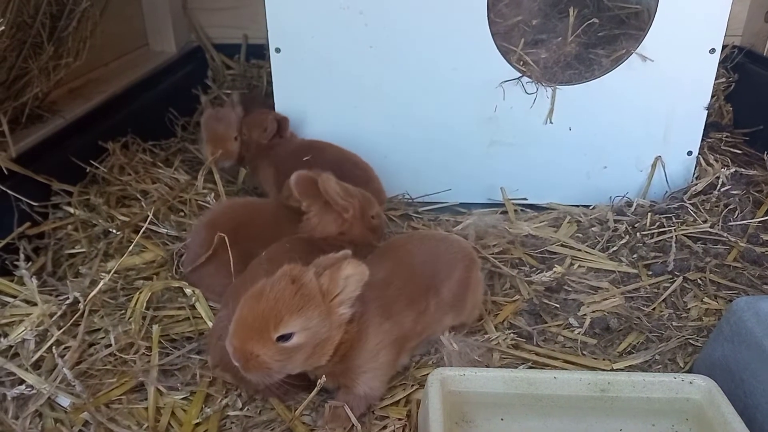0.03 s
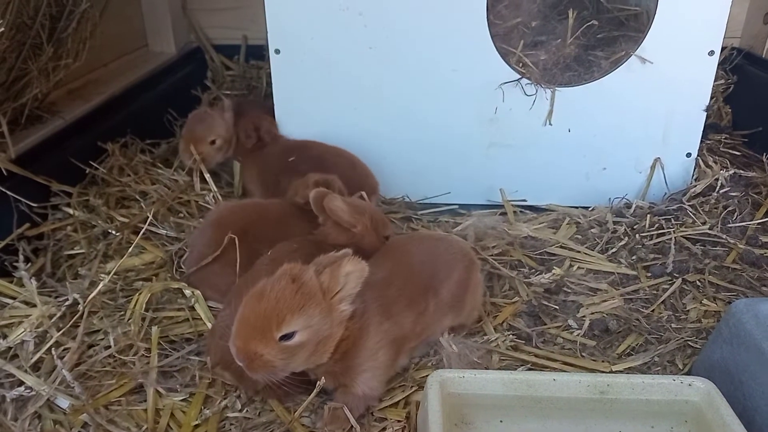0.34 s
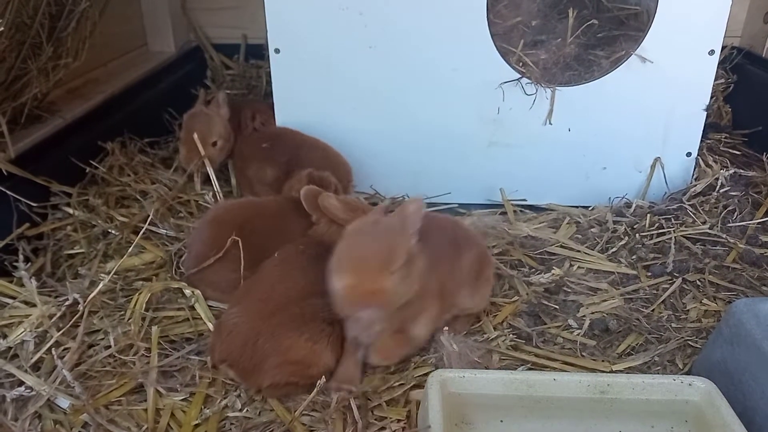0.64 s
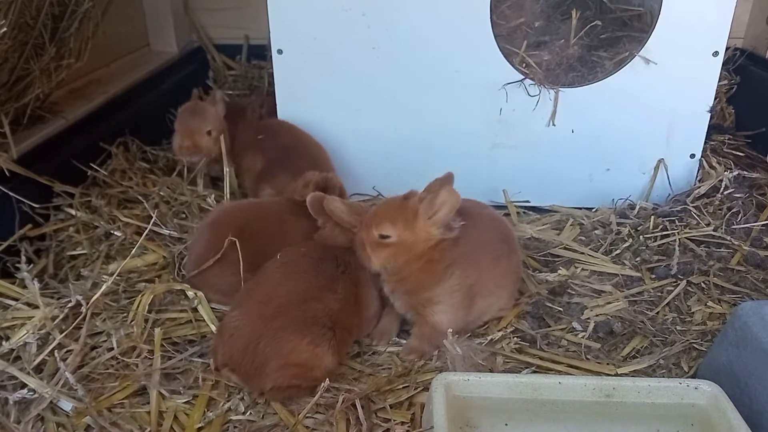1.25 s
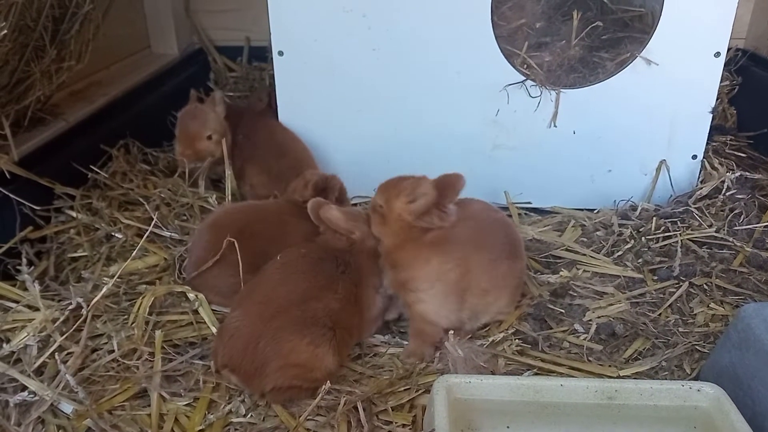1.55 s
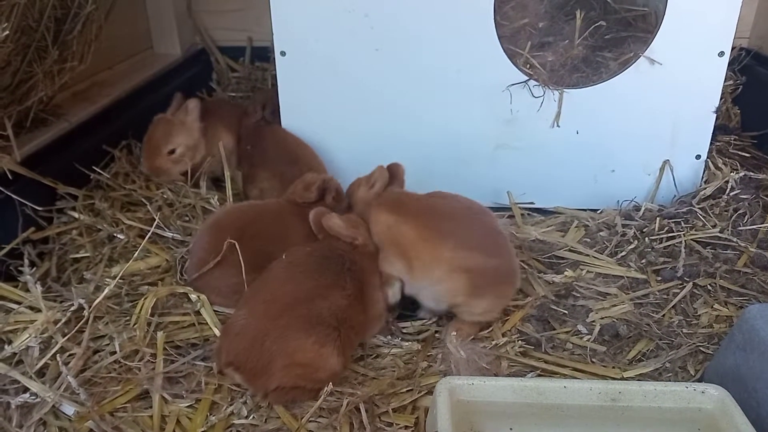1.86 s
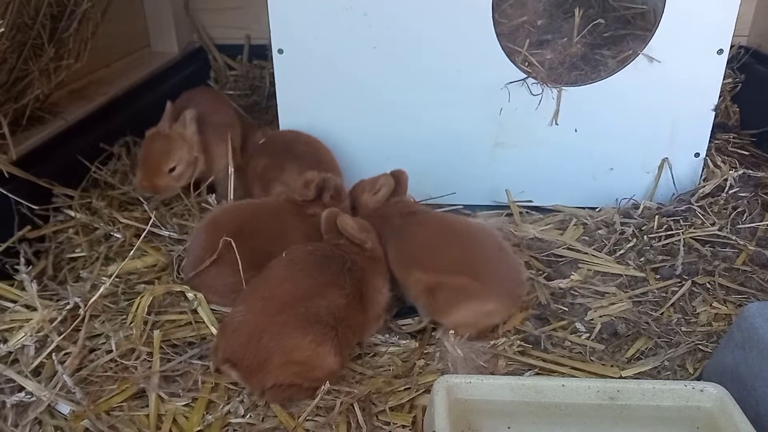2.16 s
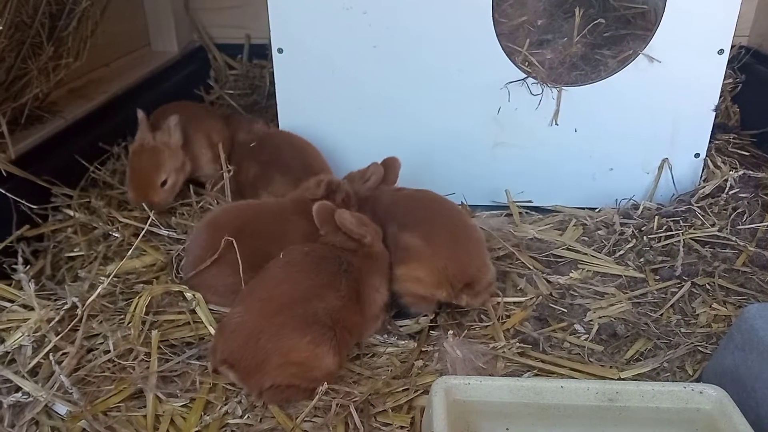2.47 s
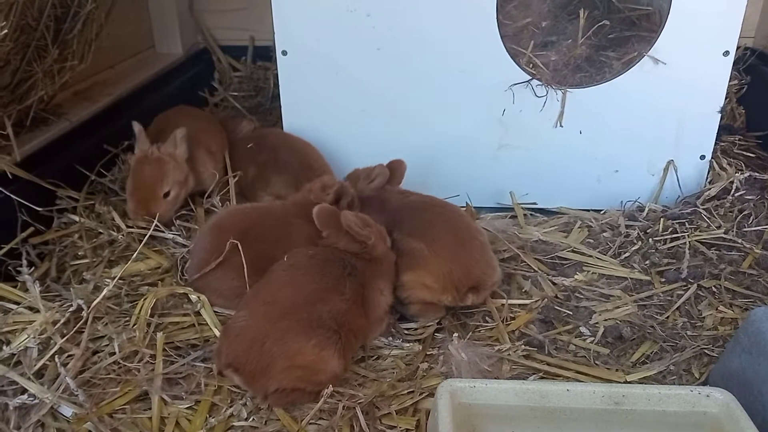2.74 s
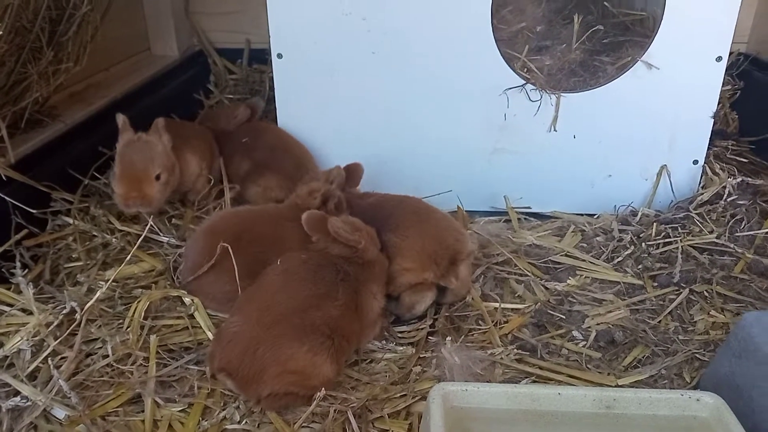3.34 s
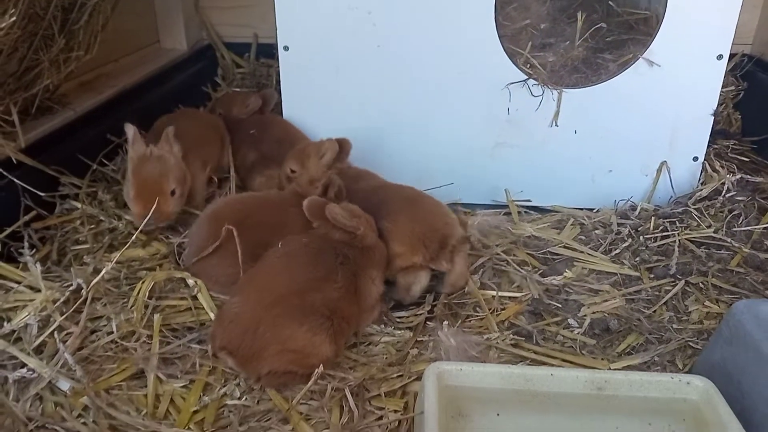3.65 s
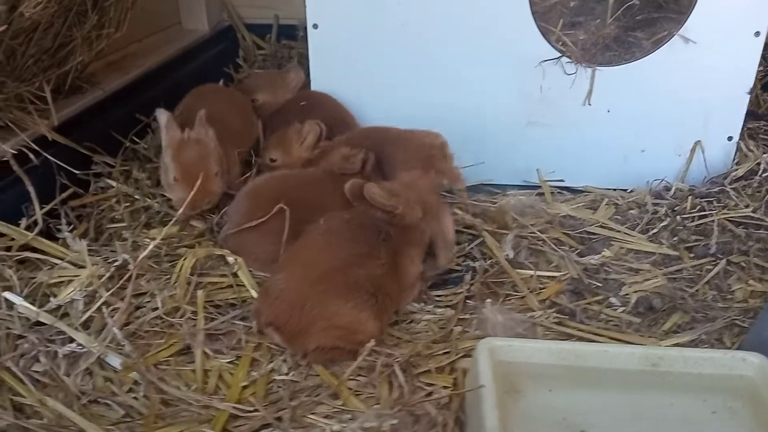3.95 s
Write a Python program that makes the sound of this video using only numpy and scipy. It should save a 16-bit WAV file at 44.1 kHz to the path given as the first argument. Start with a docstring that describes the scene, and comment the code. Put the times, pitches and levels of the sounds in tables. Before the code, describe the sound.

Straw rustles and crackles softly as young rabbits shuffle in a wooden hutch, with a snap and tiny squeak near 0.8 seconds. After a lull, crunching, snaps and light paw taps build from 1.8 seconds, peak around 2.3, continue in patches and swell again from 3.7 to 4. A distant engine hums low throughout, slowly dropping in speed, then picking up at about 3.2 seconds.

```python
"""Straw scuffs, crunches and crackles as young rabbits shuffle about a wooden hutch, each move bending a
clump of stalks. Single stalks snap, tick and squeak, and paws tap the floor; the close walls add a short
tail. From a distance an engine hums through the walls, slowly losing speed, then picking up.
Mono, on a small microphone with a sharp lift in its top treble."""
import sys
import numpy as np
from scipy import signal
from scipy.fft import rfft, irfft, next_fast_len
from scipy.io import wavfile
from scipy.ndimage import map_coordinates

SR = 44100
rng = np.random.default_rng(int(sys.argv[2]) if len(sys.argv) > 2 else 0)


def waveform_to_disk(signal):
    """Save audio, clipped to [-1, 1], as 16-bit WAV at the path in sys.argv[1]."""
    frames = np.transpose(np.atleast_2d(signal))
    scaled = np.clip(frames, -1, 1) * 32767
    samples = np.round(scaled).astype(np.int16)
    wavfile.write(sys.argv[1], SR, samples)


N = 176400

# how much the litter fidgets and the stalks settle (time [s], gain [dB])
SETTLING = [(0, 6), (.5, -18.5), (.85, 3.5), (1.0, -5.5), (1.5, -6), (1.7, -4.5), (1.9, 1), (2.3, 6),
            (2.55, -6.5), (2.8, -3), (3.05, -0.5), (3.22, -2), (3.42, 1.5), (3.58, -0.5), (3.75, 3),
            (4, -13)]
# colour of a single stalk's snap or tick (frequency [Hz], gain [dB])
STALK_COLOUR = [(400, -21), (1500, -23), (2500, -14.5), (3600, -14.5), (6000, 1.5), (8100, -4),
                (10000, 5.5), (16000, -4)]


def amp(db):
    """Decibels to gain."""
    return 10 ** (np.asarray(db) / 20)


def unit(x):
    """x at rms 1."""
    return x / np.sqrt(np.mean(x ** 2) + 1e-20)


def curves(rows):
    """One value per sample for each column after the time."""
    times, *columns = np.transpose(rows)
    return [np.interp(np.arange(N) / SR, times, column) for column in columns]


def wobble(rate):
    """A smooth random curve, rate knots a second."""
    knots = rng.standard_normal(int(N * rate / SR) + 4)
    return map_coordinates(knots, [np.arange(N) * rate / SR])


def filtered(x, response):
    """x times a response of frequency."""
    size = next_fast_len(len(x) + 8192)
    return irfft(rfft(x, size) * response(np.fft.rfftfreq(size, 1 / SR)), size)[:len(x)]


def coloured(x, points):
    """x through (frequency [Hz], gain [dB]) points on a log axis."""
    point_hz, db = np.transpose(points)
    return filtered(x, lambda hz: amp(np.interp(np.log(hz + 1), np.log(point_hz + 1), db)))


def noise(colour):
    """Coloured noise at rms 1."""
    return unit(coloured(rng.standard_normal(N), colour))


def fade(t, t60):
    """A decay of 60 dB every t60 seconds."""
    return np.exp(-np.log(1000) * t / t60)


def add(track, start, sound):
    """Mix a sound in at start seconds."""
    part = track[max(0, round(start * SR)):][:len(sound)]
    part += sound[:len(part)]


def still_air():
    """A faint, steady hiss of air round the hutch."""
    # colour of the air (frequency [Hz], gain [dB])
    air_colour = [(100, 7.5), (500, -6), (800, 3), (1500, -0.5), (2400, -6), (3500, -9), (4800, -9),
                  (6000, -10.5), (8000, -24), (12000, -16.5), (16000, -10.5)]
    return amp(-82.5) * noise(air_colour)


def engine_hum(speed_jitter=0.0071, waver_db=2):
    """The engine's orders are multiples of one slowly changing speed, each wavering in level."""
    # engine speed (time [s], speed [Hz])
    engine_speed = [(0, 26.8), (.5, 25.3), (.95, 26), (1.25, 24.44), (1.65, 23.95), (2.1, 23.8),
                    (2.5, 22.45), (3.07, 21.7), (3.22, 26.5), (3.33, 26), (3.46, 23.6), (3.72, 26.2),
                    (4, 22.6)]
    # the strong orders (time [s], third [dB], fourth [dB], fifth [dB])
    strong_orders = [(0.0, -68, -56, -77), (0.3, -62, -80.5, -76), (0.39, -74, -65, -66.5),
                     (0.54, -70, -77.5, -52), (0.66, -87, -77, -68), (0.83, -77, -55.5, -56),
                     (0.97, -58, -61, -50), (1.09, -71, -67, -50), (1.67, -68.5, -50, -39),
                     (2.03, -78, -70, -50.5), (2.09, -64, -61, -42.5), (2.23, -70, -59, -52),
                     (2.51, -73, -53.5, -48.5), (2.66, -56, -52, -56.5), (3.25, -59, -53, -51.5),
                     (3.74, -65, -57.5, -63.5), (3.78, -53.5, -55.5, -62.5), (4.0, -68.5, -66, -69)]
    # the weak orders (multiple of the speed, level against the strong ones together [dB])
    weak_orders = [(2, -24.5), (6, -28.5), (7, -23), (9, -32), (10, -29.5), (12, -34.5), (14, -45.5)]
    speed, = curves(engine_speed)
    turn = 2 * np.pi * np.cumsum(speed * (1 + speed_jitter * wobble(14))) / SR
    strong = amp(curves(strong_orders))
    together = np.linalg.norm(strong, axis=0)
    orders = list(zip((3, 4, 5), strong))
    orders += [(order, together * amp(db)) for order, db in weak_orders]
    hum = np.zeros(N)
    for order, gain in orders:
        waver = amp(waver_db * wobble(13))
        hum += np.sqrt(2) * gain * waver * np.sin(order * turn + 2 * np.pi * rng.random())
    return hum


def distant_engine(dip_s=0.02, murk_waver_db=4):
    """The engine through the walls: hum and low rumble, which dip briefly, and a dull murk above them."""
    # the low rumble round the hum (time [s], level [dB])
    rumble_level = [(0, -60.5), (.4, -61), (.6, -61), (.72, -56.5), (.95, -64), (1.15, -61.5), (1.5, -60),
                    (1.9, -58.5), (2.25, -56.5), (2.6, -61), (3.05, -64.5), (3.18, -55.5), (3.42, -55.5),
                    (3.58, -62), (4, -62.5)]
    # its colour (frequency [Hz], gain [dB])
    rumble_colour = [(20, -19), (35, -27), (52, -8.5), (90, 0.5), (135, -2), (160, -3.5), (195, -11.5),
                     (230, -9.5), (268, -27.5), (330, -28.5), (420, -27), (550, -36), (1000, -53),
                     (3000, -99)]
    # the murk, the rumble's dull upper part (time [s], level [dB])
    murk_level = [(0, -68.5), (.2, -77), (.3, -66.5), (.45, -77.5), (.62, -67.5), (.85, -83.5), (1.1, -79),
                  (1.4, -74), (1.76, -68.5), (1.86, -71.5), (2.0, -77.5), (2.2, -76.5), (2.5, -78),
                  (3.0, -85), (3.6, -78.5), (3.85, -86), (4, -80.5)]
    # its colour (frequency [Hz], gain [dB])
    murk_colour = [(150, -28), (205, -9), (240, 1), (270, -12), (335, -1), (390, -13), (440, -12.5),
                   (520, -23.5), (900, -31), (3000, -75)]
    # brief dips of hum and rumble (time [s], depth [dB])
    dips = [(.4, -2.5), (.685, -1), (0.788, -5.5), (0.993, -9.5), (3.073, -10.5), (3.561, -1.5), (3.89, -4)]
    t = np.arange(N) / SR
    hum = engine_hum()
    rumble = amp(curves(rumble_level)[0]) * noise(rumble_colour)
    murk = amp(curves(murk_level)[0] + murk_waver_db * wobble(17)) * noise(murk_colour)
    dip_db = sum(db * np.exp(-((t - when) / dip_s) ** 2) for when, db in dips)
    return amp(dip_db) * (hum + rumble) + murk


def hutch(x, t60=0.071, tail_db=-3.5):
    """The close wooden walls add a short tail, 2 ms behind the direct sound."""
    t = np.arange(SR // 8) / SR
    tail = rng.standard_normal(len(t)) * fade(t, t60) * (t > .002)
    return x + amp(tail_db) * signal.fftconvolve(x, tail / np.linalg.norm(tail))[:len(x)]


def stalk_slips(per_second, lo_hz, hi_hz, t60_cycles, spread_db, rub_db):
    """Tiny slips of stalk on stalk, each a damped ring, over a smooth rubbing noise."""
    rub = rng.standard_normal(N)
    when, pitch, size, phase = rng.random((int(per_second * N / SR), 4)).T[:, :, None]
    n = np.arange(256)
    hz = lo_hz + (hi_hz - lo_hz) * pitch
    size_db = -spread_db * np.log(np.maximum(size, .02))  # many small slips, a few large
    rings = amp(size_db) * np.sin(2 * np.pi * (hz * n / SR + phase)) * fade(n / SR, t60_cycles / hz)
    positions = (when * N).astype(int) + n
    slips = np.bincount(positions.ravel(), rings.ravel(), N)[:N]
    return unit(slips) + amp(rub_db) * rub


def hollow_stalks(x, t60=0.011, touch_s=.06, direct=1):
    """From moment to moment other hollow stalks are touched, each with resonances of its own."""
    hop = int(touch_s * SR / 2)
    window = np.sqrt(np.hanning(2 * hop))
    out, t = np.zeros(N), np.arange(SR // 16) / SR
    for start in range(0, N, hop):
        piece = x[start:start + 2 * hop]
        ring = rng.standard_normal(len(t)) * fade(t, t60)
        ring = ring / np.linalg.norm(ring) + direct * (t == 0)  # some sound passes the stalks by
        add(out, start / SR, signal.fftconvolve(piece * window[:len(piece)], ring / np.linalg.norm(ring)))
    return out


def straw_rustle(attack_s=0.029, release_s=0.022, push_db=1.2):
    """Each move swells and dies in scuff, crunch and crackle, which share the animal's uneven push."""
    # moves in the straw (start [s], length [s], scuff [dB], crunch [dB], crackle [dB])
    moves = [(0.023, 0.061, -70, -78.5, -98), (0.102, 0.177, -77, -82, -92.5),
             (0.286, 0.046, -80, -79.5, -85.5), (0.372, 0.038, -82.5, -81, -77),
             (0.436, 0.14, -85.5, -85, -91.5), (0.603, 0.027, -79, -72.5, -79),
             (0.652, 0.06, -95, -80.5, -79.5), (0.734, 0.03, -100, -72.5, -70),
             (0.772, 0.027, -78.5, -72, -69), (0.807, 0.051, -101, -78.5, -74.5),
             (1.57, 0.25, -84.5, -96.5, -94), (1.779, 0.037, -75.5, -81.5, -88.5),
             (1.838, 0.017, -76.5, -77, -72), (1.879, .022, -80, -80, -78), (1.911, 0.065, -80.5, -83, -86),
             (2.002, 0.081, -79.5, -79, -73), (2.069, 0.135, -76.5, -72.5, -70),
             (2.208, 0.058, -72, -69.5, -66.5), (2.308, 0.039, -72.5, -76.5, -68),
             (2.386, 0.087, -83, -83, -75), (2.515, 0.07, -85.5, -105, -89), (2.607, .03, -80, -81, -78.5),
             (2.681, 0.041, -76.5, -69, -68.5), (2.729, .165, -81, -86, -88.5),
             (2.942, 0.092, -79.5, -73, -73), (3.051, 0.13, -84.5, -82.5, -87.5),
             (3.247, 0.049, -90, -89, -80), (3.348, 0.12, -85.5, -96, -89.5),
             (3.662, 0.088, -83.5, -75.5, -71.5), (3.755, 0.025, -69, -76, -65),
             (3.782, 0.032, -73, -72.5, -70), (3.841, 0.063, -72.5, -75, -73),
             (3.904, 0.058, -71, -67.5, -65), (3.983, .03, -70, -70, -65)]
    # faint fidgeting under the moves (scuff [dB], crunch [dB], crackle [dB])
    fidget_db = [-87.5, -89.5, -92]
    # the straw's three colours, low to high (frequency [Hz], gain [dB])
    scuff_colour = [(250, -24), (550, -11), (760, -0.5), (1080, -6.5), (1550, 1), (2080, -1), (2520, 3.5),
                    (2900, -3), (3400, -14.5), (4200, -41), (8000, -85)]
    crunch_colour = [(2000, -1), (3600, -12.5), (4150, -8), (4750, -0.5), (5350, -1.5), (6050, 0),
                     (6600, -5.5), (7100, -10.5), (8100, -17), (10000, -26), (16000, -65.5)]
    crackle_colour = [(4000, -5), (8100, -11.5), (9200, 0), (10200, 0.5), (11300, 0), (13500, -1.5),
                      (16000, 0.5)]
    push = amp(push_db * wobble(80))
    scuff = stalk_slips(1100, 528, 3350, t60_cycles=18, spread_db=1.5, rub_db=0.5)
    scuff = hollow_stalks(scuff, t60=.026, touch_s=.16, direct=.55)  # thick stalks
    crunch = hollow_stalks(stalk_slips(1400, 3000, 8500, t60_cycles=18, spread_db=1.0, rub_db=-2.5))
    crackle = hollow_stalks(stalk_slips(800, 7000, 16000, t60_cycles=16, spread_db=4.5, rub_db=-4.0))
    pairs = (scuff, scuff_colour), (crunch, crunch_colour), (crackle, crackle_colour)
    layers = [unit(push * coloured(x, colour)) for x, colour in pairs]
    t = np.arange(N) / SR
    power = (amp(fidget_db)[:, None] * amp(curves(SETTLING)[0])) ** 2
    for start, length, *layer_db in moves:
        swell = np.clip((t - start) / attack_s + .5, 0, 1)
        release = np.exp(-np.maximum(t - start - length, 0) / release_s)
        power += (amp(layer_db)[:, None] * swell * release) ** 2
    return hutch(np.sum(np.sqrt(power) * layers, axis=0))


def stalk_ticks(per_second=55, lo_hz=4300, hi_hz=12630, t60=0.022):
    """Bent stalks settle at random moments with tiny pitched ticks."""
    out, t = np.zeros(N), np.arange(SR // 40) / SR
    settling_db, = curves(SETTLING)
    for when, pitch, softness in rng.random((int(per_second * N / SR), 3)):
        hz = lo_hz + (hi_hz - lo_hz) * pitch
        db = -71 + settling_db[int(when * N)] - 14 * softness
        phase_drift = .2 * np.cumsum(rng.standard_normal(len(t)))
        add(out, when * N / SR, amp(db) * np.sin(2 * np.pi * hz * t + phase_drift) * fade(t, t60))
    return hutch(coloured(out, STALK_COLOUR))


def stalk_snaps(bend_s=0.0023, trim_db=-9.5):
    """A stalk bends, cracks, rings for an instant and splinters. The bright clicks near 1.2 s are a rabbit
    nibbling, made the same way."""
    # single stalks snapping, and from 1.17 to 1.27 s a rabbit nibbling (time [s], relative level [dB], ring
    # [Hz])
    snaps = [(0.0267, -58, 4900), (0.039, -63, 4870), (0.0755, -52, 7150), (0.738, -47, 6020),
             (1.1727, -70.5, 4104), (1.213, -70, 4320), (1.233, -65.5, 10300), (1.273, -73, 4300),
             (1.481, -60, 10900), (1.57, -58.5, 4060), (1.59, -54.5, 4780), (1.8442, -52.5, 6070),
             (1.89, -53, 9600), (2.1038, -48, 5953), (2.14, -54.5, 6680), (2.265, -43.5, 7100),
             (2.3106, -50, 5944), (2.333, -43, 10200), (2.606, -56.5, 12700), (2.9745, -56.5, 6240),
             (3.0622, -61, 5255), (3.1622, -58.5, 5670), (3.3016, -70, 4535), (3.372, -59.5, 11400),
             (3.4184, -64, 10100), (3.48, -58, 11790), (3.6272, -60.5, 5665), (3.76, -48, 9800),
             (3.7662, -50, 6640), (3.774, -53, 10100), (3.8277, -51.5, 12800), (3.8542, -50.5, 5700),
             (3.9192, -47, 6300)]
    lead = SR // 50
    out, t = np.zeros(N), np.arange(-lead, SR // 10) / SR
    after = np.maximum(t, 0)
    bend = amp(-7.5) * np.exp(np.minimum(t, 0) / bend_s)  # fibres give way just before the crack
    splinter = amp(-14) * fade(after, t60=0.046)
    envelope = np.where(t < 0, bend, fade(after, t60=0.016) + splinter)
    for when, db, hz in snaps:
        crack = rng.standard_normal(len(t)) * envelope
        ring = amp(2.5) * np.sin(2 * np.pi * hz * after) * fade(after, t60=.01)
        add(out, when - lead / SR, hutch(amp(db + trim_db) * (crack + ring)))
    return coloured(out, STALK_COLOUR)


def paw_taps():
    """A paw presses a hollow stalk against the floor: a short burst in one resonance."""
    # paw taps (time [s], level [dB], pitch [Hz], width [Hz], t60 [s])
    taps = [(0.076, -65.5, 1900, 1500, 0.018), (.824, -70, 765, 200, 0.066), (1.032, -67, 5350, 450, .016),
            (1.483, -67.5, 1835, 905, .04), (1.724, -66.5, 2350, 697, .046), (1.796, -61, 1704, 800, 0.052),
            (2.105, -63.5, 1490, 1000, 0.05), (2.106, -65.5, 790, 300, .06),
            (2.216, -60.5, 4820, 2200, 0.029), (2.233, -59.5, 4490, 1500, 0.029),
            (2.233, -64, 1030, 450.4, .07), (2.265, -63, 2300, 899.5, 0.022),
            (2.708, -70.5, 1590, 250, .046), (2.771, -68, 1600, 250, 0.11), (3.39, -69.5, 1567, 303, 0.092),
            (3.765, -60, 6400, 1000, 0.051), (3.795, -64.5, 790, 250.3, .06),
            (3.935, -64.5, 1900, 700, .05)]
    out, t = np.zeros(N), np.arange(SR // 5) / SR
    for when, db, hz, width, t60 in taps:
        resonance = lambda f: (1j * f * width / (hz * hz - f * f + 1j * f * width)) ** 2
        burst = unit(filtered(rng.standard_normal(2 * len(t)), resonance)[len(t):])
        add(out, when, hutch(amp(db) * burst * fade(t, t60)))
    return out


def stalk_squeak(pitch_jitter=0.0085):
    """A sliding stalk sticks and slips at a nearly steady pitch."""
    # the squeak (start [s], length [s], pitch [Hz], level [dB])
    squeaks = [(.78, 0.11, 3160, -77)]
    out = np.zeros(N)
    for start, length, hz, db in squeaks:
        n = int(length * SR)
        phase = 2 * np.pi * np.cumsum(hz * (1 + pitch_jitter * wobble(500)[:n])) / SR
        add(out, start, amp(db) * np.sin(phase) * np.sqrt(np.hanning(n)))
    return out


def scene():
    """At the hutch, in one channel: rabbits in the straw over still air and the far engine."""
    background = still_air() + distant_engine()
    straw = stalk_snaps() + paw_taps() + stalk_squeak() + straw_rustle() + stalk_ticks()
    return (background + straw)[None]


def record(dry):
    """The small microphone lifts the top treble and keeps nothing above 15.8 kHz."""
    # microphone response (frequency [Hz], gain [dB])
    mic_colour = [(20, -1), (13000, -3.5), (14000, 0), (14700, 8), (15500, 12), (16000, 7)]
    return np.array([filtered(coloured(x, mic_colour), lambda hz: hz < 15800) for x in dry])


dry = scene()
out = record(dry)
waveform_to_disk(out)
```